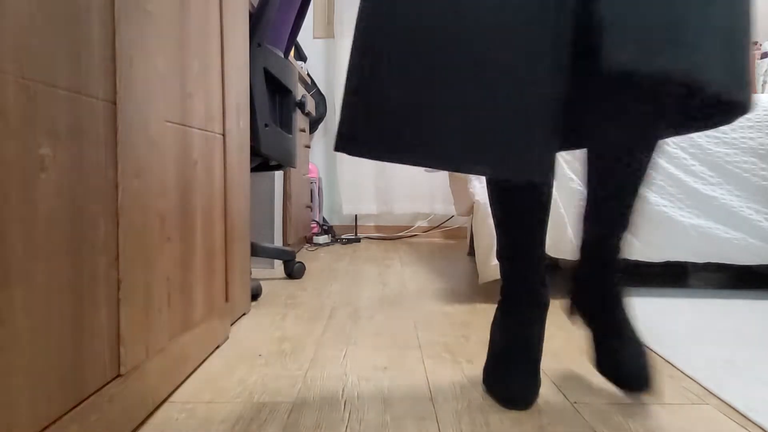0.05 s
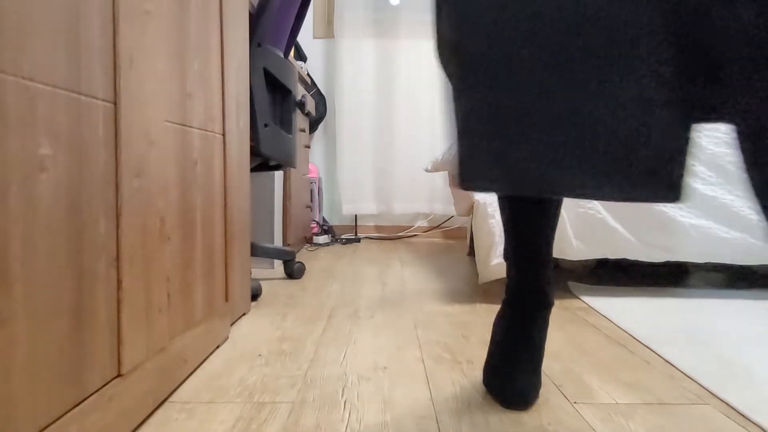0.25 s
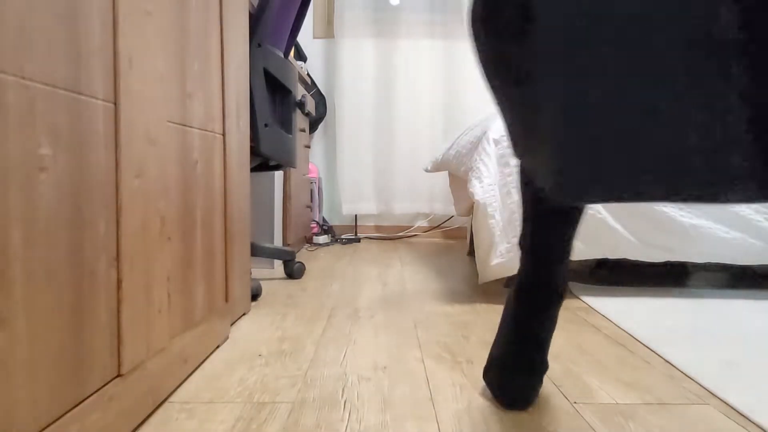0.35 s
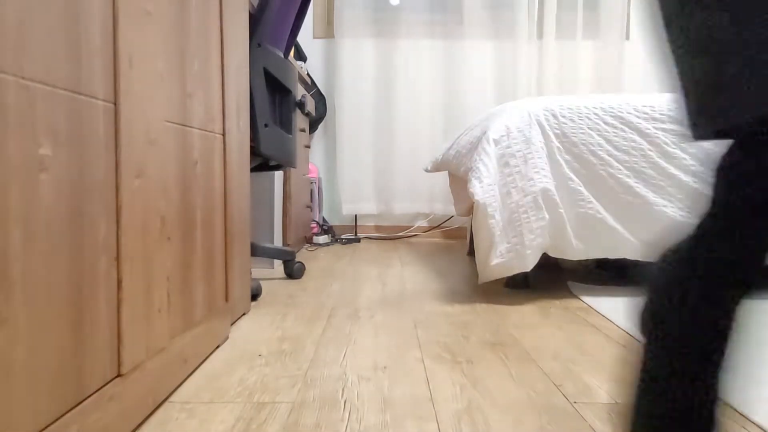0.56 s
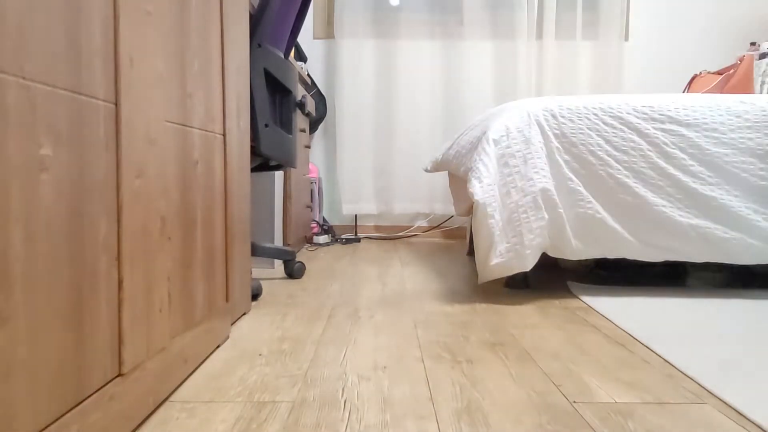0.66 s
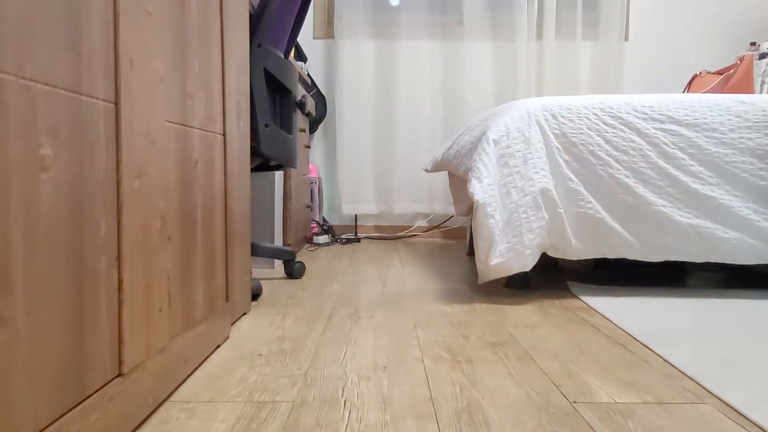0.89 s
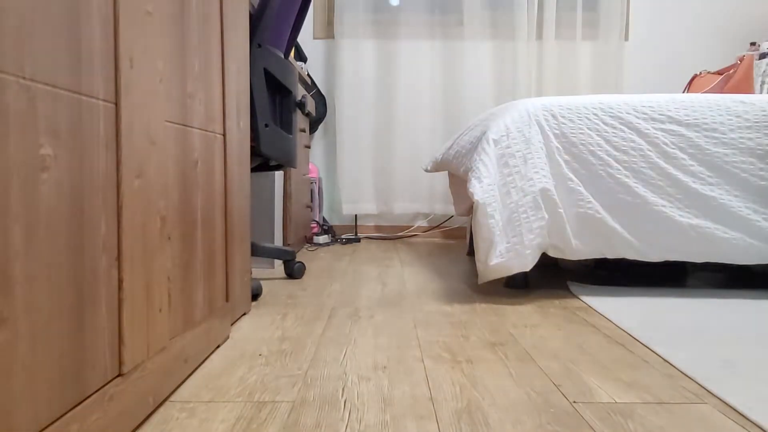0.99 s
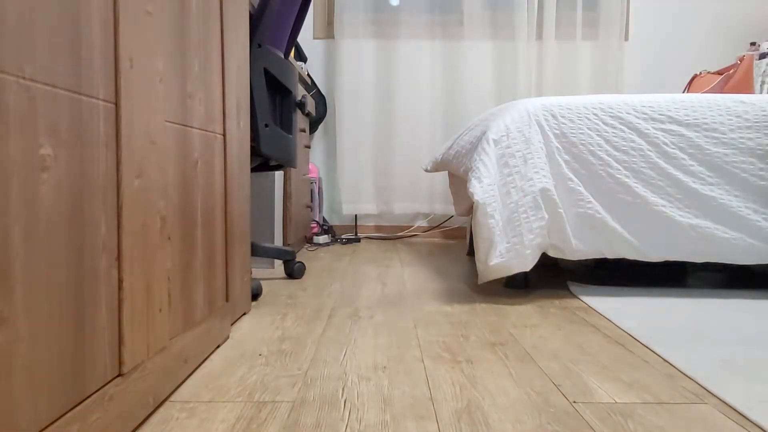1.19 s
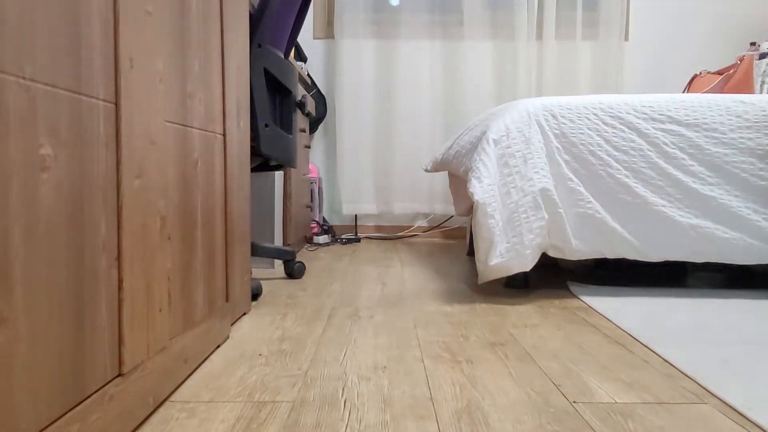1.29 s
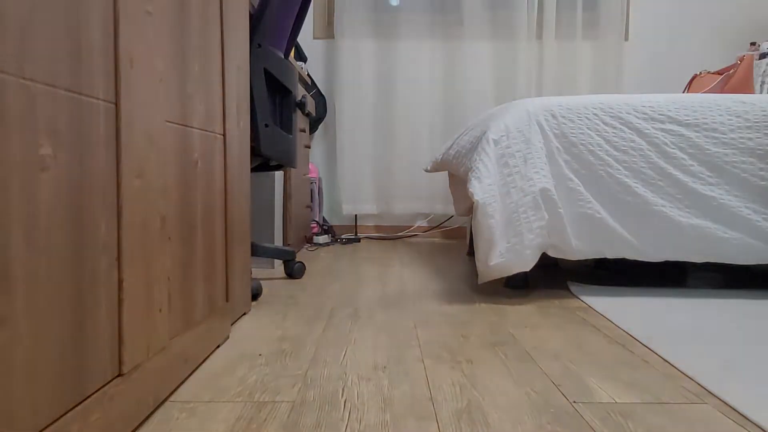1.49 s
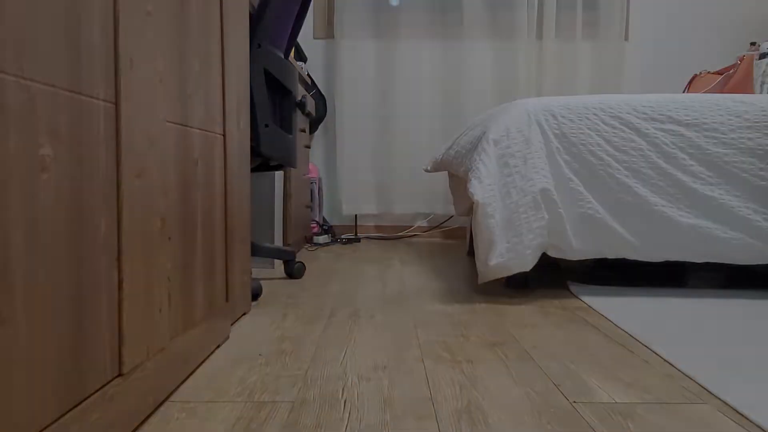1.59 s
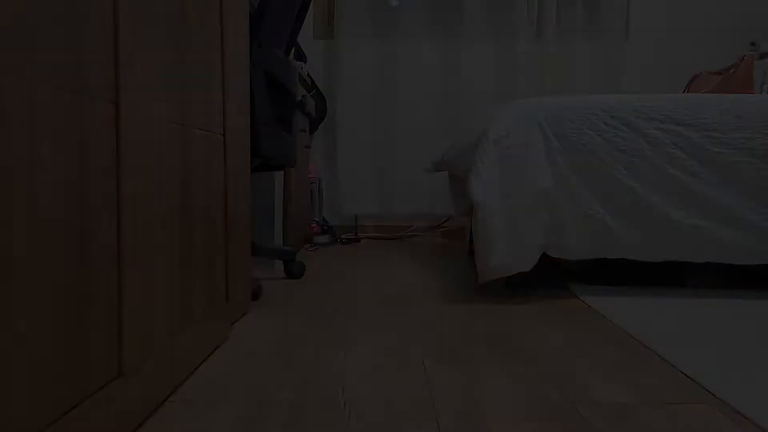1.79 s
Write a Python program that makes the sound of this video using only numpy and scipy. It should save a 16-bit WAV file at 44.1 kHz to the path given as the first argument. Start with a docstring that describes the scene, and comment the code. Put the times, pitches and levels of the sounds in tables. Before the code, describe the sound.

Three soft footsteps pass on a wooden floor, with a faint rustle of a coat.

```python
"""A faint coat rustle and a soft floor bump over the quiet air of a small bedroom, then three steps
in soft shoes, passing to the right of a low microphone. Each is a dull heel thud on the wooden
boards, then the slap of the sole. The floor bumps and sways under the shifting weight and the
sole rubs as the foot rolls. The long coat rustles, ticks and swishes once against a leg."""
import sys
import numpy as np
from scipy import signal
from scipy.fft import rfft, irfft
from scipy.io import wavfile
from scipy.ndimage import uniform_filter1d

SR = 44100
rng = np.random.default_rng(int(sys.argv[2]) if len(sys.argv) > 2 else 0)


def store_pcm(level_fs):
    """Save levels as 16-bit WAV."""
    pcm = np.round(np.clip(level_fs, -1, 1) * 32767).astype(np.int16)
    wavfile.write(sys.argv[1], SR, np.atleast_2d(pcm).T)


N = 81585
HIT_SIZE = 12288  # samples in one hit with its room tail
HZ, HIT_TIME = np.fft.rfftfreq(HIT_SIZE, 1 / SR), np.arange(HIT_SIZE) / SR
SCENE_HZ, TIME = np.fft.rfftfreq(N, 1 / SR), np.arange(N) / SR


def amp(db):
    """Decibels to gain."""
    return 10 ** (np.asarray(db) / 20)


def unit(x):
    """Scales to rms 1."""
    return x / np.sqrt(np.mean(x ** 2) + 1e-20)


def curve(points, hz):
    """Reads a breakpoint curve on a log-frequency axis."""
    f, value = np.transpose(points)
    return np.interp(np.log(hz + 1), np.log(f), value)


def delay(s):
    """Response of a delay of s seconds."""
    return np.exp(-2j * np.pi * HZ * s)


def lowpass(hz, q):
    """Two-pole low-pass response."""
    s = 1j * HZ / hz
    return 1 / (1 + s / q + s * s)


def band(hz, q):
    """A resonance, gain 1 at its peak."""
    return 1j * HZ / (hz * q) * lowpass(hz, q)


def ring(hz, t60):
    """Response of one mode that dies in t60 seconds."""
    return band(hz, np.pi * hz * t60 / np.log(1000))


def click(eq):
    """Spectrum of the tightest click that has this EQ (minimum phase)."""
    log_gain = np.log(amp(curve(eq, HZ)))
    mirrored = np.r_[log_gain, log_gain[-2:0:-1]]
    return np.exp(np.conj(signal.hilbert(mirrored))[:len(HZ)])


def grit(decay_s=0.002):
    """Spectrum of a few milliseconds of tiny contacts."""
    burst = rng.standard_normal(HIT_SIZE) * np.exp(-HIT_TIME / decay_s)
    return rfft(unit(burst)) / np.sqrt(HIT_SIZE)


def swell(peak, rise, fall, db):
    """Envelope with a rounded attack and an exponential release."""
    t = TIME - peak
    return amp(db) * np.exp(-np.where(t < 0, (t / rise) ** 2, t / fall))


def add(mix, s, sound):
    """Mixes a stereo sound in at time s."""
    part = mix[:, max(round(s * SR), 0):][:, :sound.shape[1]]
    part += sound[:, :part.shape[1]]


# Stereo image of the room: f/Hz, left-right correlation
CORRELATION = [(25, 1), (70, 0.55), (150, 1), (350, 0), (700, 0.57), (1300, 0), (16000, 0.065)]


def stereo_noise(size):
    """Diffuse noise, narrow in the bass and wide in the treble."""
    a, b = rfft(rng.standard_normal((2, size)))
    same = curve(CORRELATION, np.fft.rfftfreq(size, 1 / SR))
    mid, side = a * np.sqrt((1 + same) / 2), b * np.sqrt((1 - same) / 2)
    return irfft(np.array([mid + side, mid - side]), size)


def noise(eq):
    """Coloured stereo noise of rms 1."""
    return unit(irfft(rfft(stereo_noise(N)) * amp(curve(eq, SCENE_HZ)), N))


# Reverb decay: f/Hz, T60/s
ROOM_DECAY = [(60, 0.15), (150, 0.39), (400, 0.22), (1000, 0.23), (2800, 0.2), (7300, 0.24), (15000, .15)]
# Reverb EQ: f/Hz, level/dB
ROOM_EQ = [(50, 2.5), (200, -3), (600, -5), (1500, -1.5), (2800, 0), (5000, -2.5), (14000, 0)]
# Early reflections off the wardrobe and the bed: t/s, level/dB
REFLECTIONS = [(.0059, -33), (0.0109, -21.5)]


def in_room(spectrum, left_lag_ms, reverb_db, onset_s=0.0027):
    """A hit arrives from the right, with two early reflections and a short diffuse tail."""
    hz, t, frames = signal.stft(stereo_noise(HIT_SIZE), SR, nperseg=256)
    decay = amp(-60 * t / curve(ROOM_DECAY, hz)[:, None])
    tail = signal.istft(frames * decay, SR, nperseg=256)[1][:, :HIT_SIZE]
    attack = 1 - np.exp(-(HIT_TIME / onset_s) ** 2)
    tail = unit(tail * attack) / np.sqrt(HIT_SIZE)
    reverb = amp(reverb_db + curve(ROOM_EQ, HZ)) * rfft(tail)
    direct = np.array([delay(left_lag_ms / 1000), delay(0)])
    early = direct * (1 + sum(amp(db) * delay(s) for s, db in REFLECTIONS))
    fade_out = np.minimum(2 * (1 - HIT_TIME / HIT_TIME[-1]), 1) ** 2
    return irfft(spectrum * (early + reverb)) * fade_out


# Room tone EQ: f/Hz, level/dB
AIR_EQ = [(20, -3), (50, -3.5), (110, 4), (170, -8.5), (400, -15.5), (1200, -15.5), (3000, -22),
          (5500, -28.5), (9000, -25), (12000, -35), (16000, -39.5)]


def room_tone():
    """A steady, bass-heavy bed of quiet room noise."""
    return amp(-68) * noise(AIR_EQ)


def friction(strokes, eq, grain_db=2, grain_s=0.0058):
    """Grainy rubbing noise that swells with each stroke."""
    grain = unit(uniform_filter1d(rng.standard_normal(N), round(grain_s * SR)))
    texture = unit(noise(eq) * amp(grain_db * grain))
    return texture * sum(swell(*stroke) for stroke in strokes)


# Coat moves: peak t/s, rise/s, fall/s, level/dB
COAT_STROKES = [(.01, 0.041, 0.071, -71.5), (.195, 0.031, 0.15, -62), (.445, 0.034, 0.1, -62.5),
                (.65, 0.03, 0.029, -65), (.72, 0.073, 0.22, -60), (.905, 0.023, 0.02, -49.5),
                (1.03, 0.21, 0.21, -67)]
# Cloth EQ: f/Hz, level/dB
CLOTH_EQ = [(150, -6), (900, -8.5), (1500, 3), (2800, 2.5), (4500, -3.5), (9000, -8.5), (15000, -13.5)]


def coat_rustle():
    """The cloth of the long coat rubs in soft swells."""
    return friction(COAT_STROKES, CLOTH_EQ)


def thud(body_hz, q, top_hz):
    """A cushioned blow pushes the floor down; it springs back once or twice."""
    body = (HZ / body_hz) ** 2 * lowpass(body_hz, q)
    return body * lowpass(top_hz, 1.0) * lowpass(top_hz * 0.76, 0.55)


# Floor bumps: t/s, level/dB, body f/Hz, high cut f/Hz
FLOOR_BUMPS = [(.008, -11, 148, 274), (.359, 3, 104, 204), (.412, -10.5, 196, 824), (0.4763, 7, 99, 294),
               (0.502, 2, 83.3, 157), (0.551, -10, 131, 327), (0.612, -8, 87, 417), (0.951, 0, 170, 257),
               (0.974, -6.5, 190.8, 248), (1.053, -9.5, 165, 407), (1.2446, 3.5, 62, 131.5),
               (1.551, -1.5, 199, 263)]


def floor_bumps():
    """The boards bump softly as the weight shifts."""
    out = np.zeros((2, N))
    for s, db, body_hz, top_hz in FLOOR_BUMPS:
        bump = thud(body_hz, q=1.13, top_hz=top_hz)
        add(out, s, amp(db) * in_room(bump, left_lag_ms=0.59, reverb_db=-5.5))
    return out


# Clothing ticks: t/s, level/dB
CLOTH_TICKS = [(.055, -35), (.426, -28), (.562, -38.5), (.9385, -25.5)]
# Tick EQ: f/Hz, level/dB
TICK_EQ = [(200, -7.5), (1500, 10.5), (3500, -3), (8500, 3.5), (15000, -11)]


def clothing_ticks():
    """The clothing crackles in tiny, bright bursts."""
    out = np.zeros((2, N))
    for s, db in CLOTH_TICKS:
        add(out, s, amp(db) * in_room(grit() * click(TICK_EQ), left_lag_ms=0.25, reverb_db=-2.5))
    return out


# Heel hits: t/s, level/dB, body f/Hz, high cut f/Hz, left lag/ms, reverb/dB, ring f/Hz, ring level/dB
HEEL_HITS = [(0.2421, 20.5, 261.5, 448, 0.35, -1, 370, -29),
             (0.8266, 22.5, 156.2, 372, 0.27, -6.5, 178.6, -9),
             (1.4685, 11, 186, 684, 0.27, -3.5, 552, 7.5)]


def heel_thuds():
    """Each heel lands as a bell-shaped push: a thud, a hollow ring of the board and a trace of grit."""
    out = np.zeros((2, N))
    for s, db, body_hz, top_hz, lag_ms, reverb_db, ring_hz, ring_db in HEEL_HITS:
        body = (HZ / body_hz) ** 2 * lowpass(body_hz, q=0.83)
        board = body - amp(ring_db) * ring(ring_hz, t60=0.031)
        push = np.exp(-(HZ / top_hz) ** 2)
        crunch = amp(-35) * grit() * lowpass(hz=3000, q=0.6)
        blow = (board * push + crunch) * delay(1 / top_hz)  # leaves time for the push to rise
        add(out, s, amp(db) * in_room(blow, lag_ms, reverb_db))
    return out


# Low sways: peak t/s, rise/s, fall/s, level/dB, f/Hz, left minus right/dB
FLOOR_SWAYS = [(0.318, .03, 0.2, -60, 54.3, -2), (0.501, 0.029, 0.13, -53.5, 93, -5),
               (0.664, 0.1, 0.11, -56.5, 52.1, -10), (1.041, 0.057, 0.055, -49, 54.7, -15),
               (1.508, 0.0086, .04, -54, 54, 1)]


def floor_sway(width_hz=45, roughness=0.6):
    """The floor sways under the weight: a low tone roughened by a narrow band of noise."""
    out = np.zeros((2, N))
    for peak, rise, fall, db, hz, pan_db in FLOOR_SWAYS:
        narrow_band = np.exp(-((SCENE_HZ - hz) / width_hz) ** 2)
        wobble = unit(irfft(rfft(stereo_noise(N)) * narrow_band, N))
        tone = np.sqrt(2) * np.sin(2 * np.pi * hz * (TIME - peak))
        pan = amp([[pan_db / 2], [-pan_db / 2]])
        out += swell(peak, rise, fall, db) * (tone + roughness * wobble) * pan
    return out


# Sole hits: t/s, level/dB, high cut f/Hz, left lag/ms, reverb/dB, floor push/dB,
# second contact delay/ms, second contact/dB, clack/dB, crisp edge/dB
SOLE_HITS = [(0.2999, 9, 9000, 0.3, -7, 16, 1.58, -13, 2.5, -32),
             (.8810, 3, 9300, .19, -4.5, 19.5, 1.6, -12, -13.5, -4.5),
             (1.4872, 0.5, 2874, 0.2, -3.5, 15.5, 0.783, -13.5, -10.5, -9.5)]
# Slap EQ: f/Hz, level/dB
SLAP_EQ = [(40, -25), (200, -4), (420, -2.5), (700, 2), (1000, -2), (1700, -3), (2300, -5), (3200, -3),
           (4100, -17), (6000, -14.5), (8500, -9), (11000, -18.5), (16000, -15.5)]
# Modes of shoe and boards: f/Hz, level/dB
BOARD_MODES = [(610, -3), (1270, -4.5), (1750, -5), (2560, -8.5), (3130, -2.5), (8500, -8.5)]


def sole_slaps(t60_at_1k=0.02, clack_hz=694, push_late_s=0.0032):
    """The sole slaps down in two quick contacts, clacks on the boards and presses into the floor."""
    out = np.zeros((2, N))
    strike = click(SLAP_EQ)
    for hz, db in BOARD_MODES:
        strike += amp(db) * ring(hz, t60_at_1k * np.sqrt(1000 / hz)) * band(hz, q=1)
    clack = band(clack_hz, q=2.3) * amp([[-7], [0]])  # panned right
    push = thud(body_hz=122, q=1.1, top_hz=184)
    for s, db, top_hz, lag_ms, reverb_db, push_db, again_ms, again_db, clack_db, crisp_db in SOLE_HITS:
        crunch = amp(-9) * grit() * HZ / (HZ + clack_hz)
        contacts = 1 + amp(again_db) * delay(again_ms / 1000) + crunch
        crisp_edge = amp(crisp_db) * grit() * band(hz=4800, q=1.3) ** 2
        slap = strike * contacts + amp(clack_db) * clack + crisp_edge
        high_cut = lowpass(top_hz, q=np.sqrt(0.5)) * lowpass(hz=9800, q=0.48)
        add(out, s, -amp(db) * in_room(slap * high_cut, lag_ms, reverb_db))
        add(out, s + push_late_s, amp(push_db) * in_room(push, lag_ms, reverb_db=-10.5))
    return out


# Sole rubs: peak t/s, rise/s, fall/s, level/dB
RUB_STROKES = [(.472, .035, 0.032, -50), (.555, 0.019, 0.024, -58.5), (.62, 0.014, 0.033, -60.5),
               (1.10, 0.09, 0.11, -59)]
# Rub EQ: f/Hz, level/dB
RUB_EQ = [(100, 20), (400, 7), (750, 11.5), (1400, 5), (2500, -11), (12000, -17)]


def sole_rubs():
    """The sole rubs dully on the wood as the foot rolls."""
    return friction(RUB_STROKES, RUB_EQ)


# Swish envelope: peak t/s, rise/s, fall/s
SWISH_STROKE = (1.178, .013, .024)
# Swish EQ: f/Hz, level/dB
SWISH_EQ = [(200, -51.5), (1300, -18), (1500, 7), (1700, -2.5), (2250, -8), (2540, 0.5), (2850, -4),
            (4200, -8), (8000, -15), (15000, -32)]


def coat_swish(db=-51):
    """The coat brushes a leg and its fabric sings."""
    return friction([(*SWISH_STROKE, db)], SWISH_EQ)


def scene():
    """Mixes room tone, coat, floor and footsteps."""
    coat = coat_rustle() + clothing_ticks() + coat_swish()
    floor = floor_bumps() + floor_sway()
    steps = heel_thuds() + sole_slaps() + sole_rubs()
    return room_tone() + coat + floor + steps


def record(dry):
    """A steep high cut at 16 kHz on the whole mix."""
    high_cut = signal.firwin(255, 16000, window=("kaiser", 9), fs=SR)
    return signal.oaconvolve(dry, high_cut[None], "same")


dry = scene()
out = record(dry)
store_pcm(out)
```